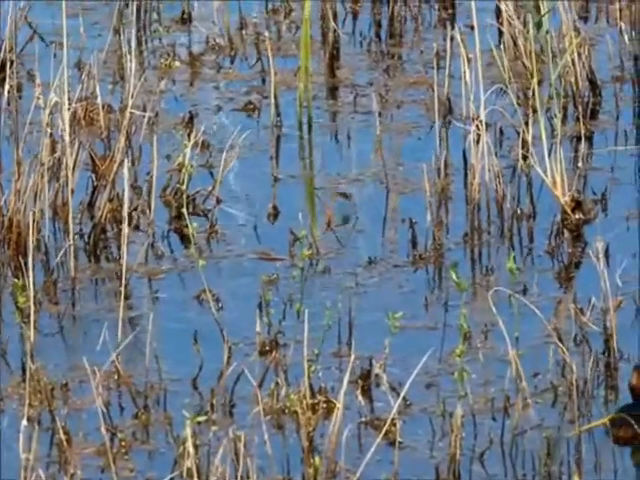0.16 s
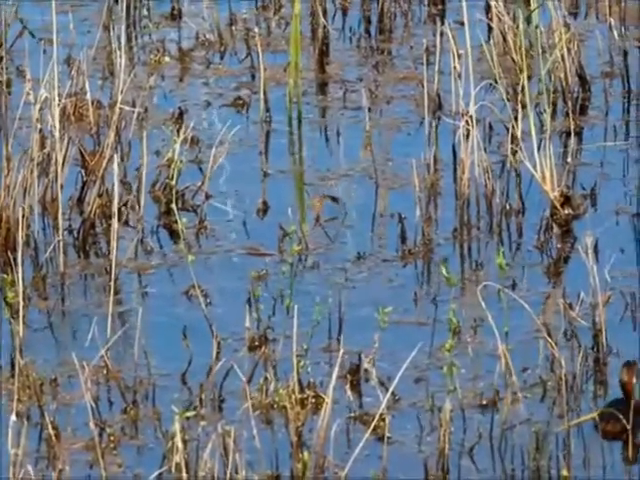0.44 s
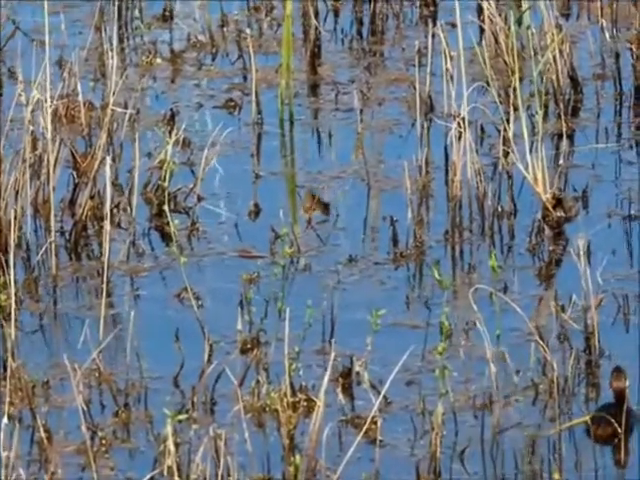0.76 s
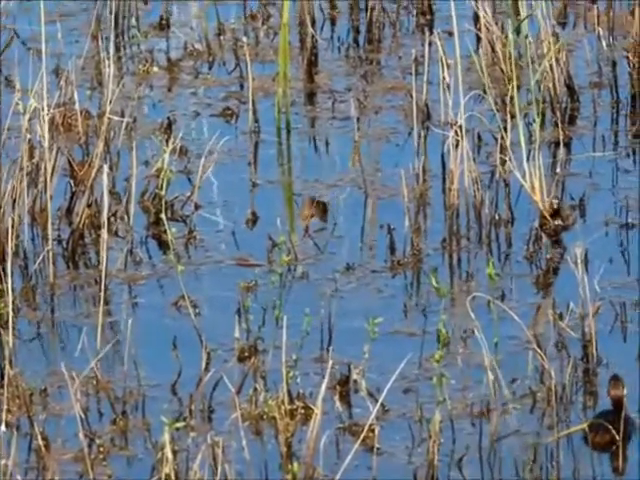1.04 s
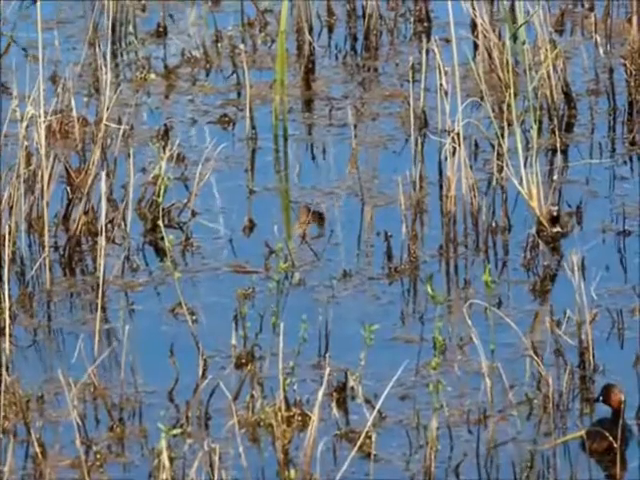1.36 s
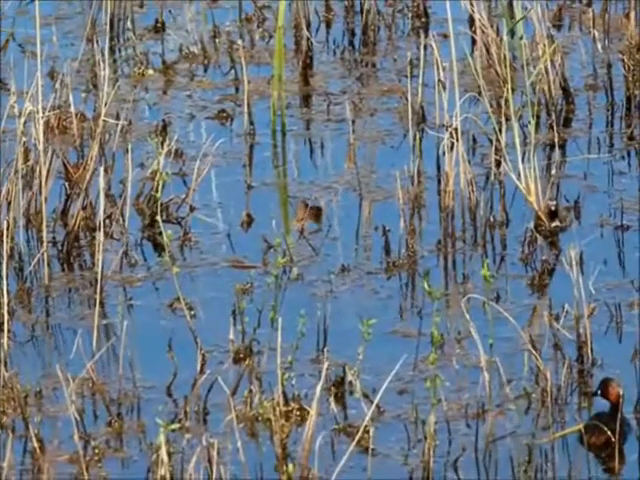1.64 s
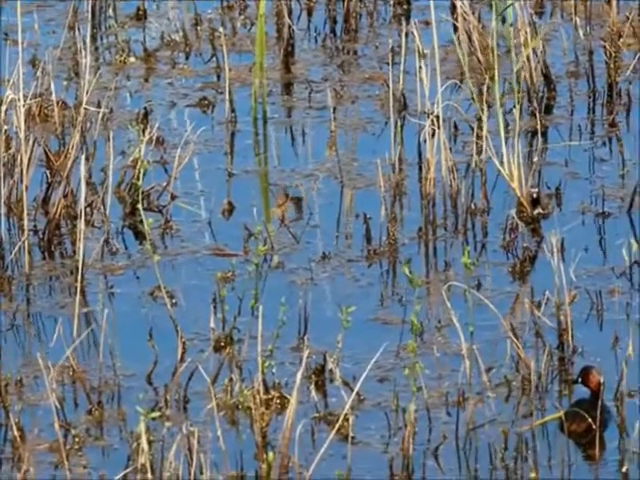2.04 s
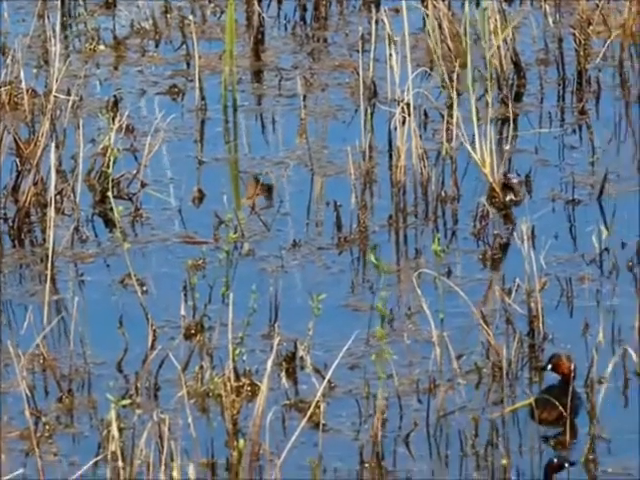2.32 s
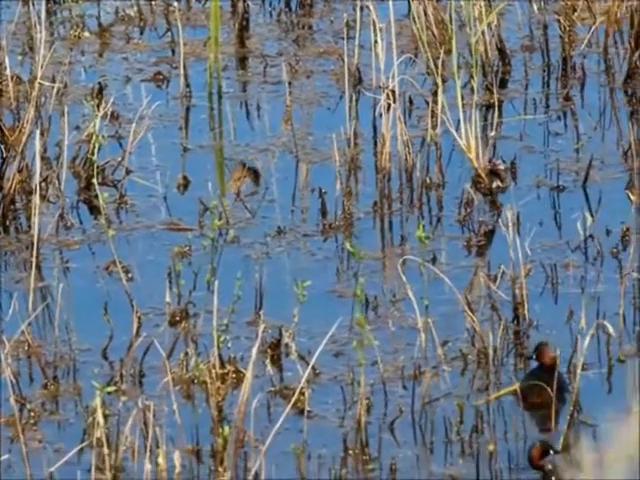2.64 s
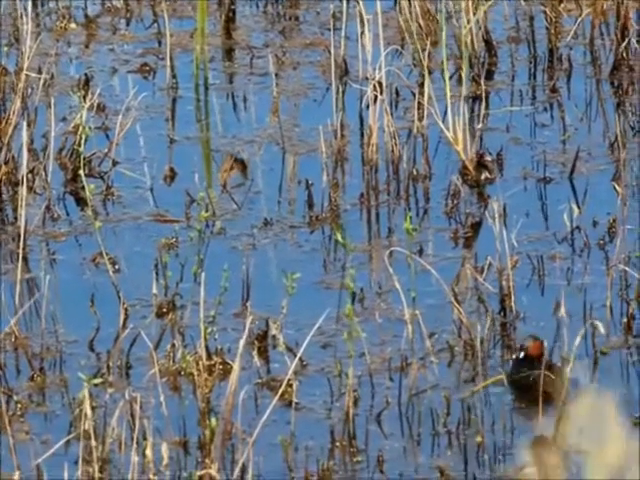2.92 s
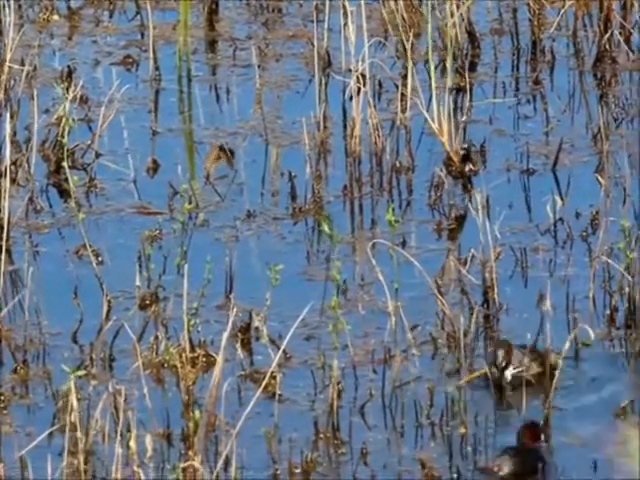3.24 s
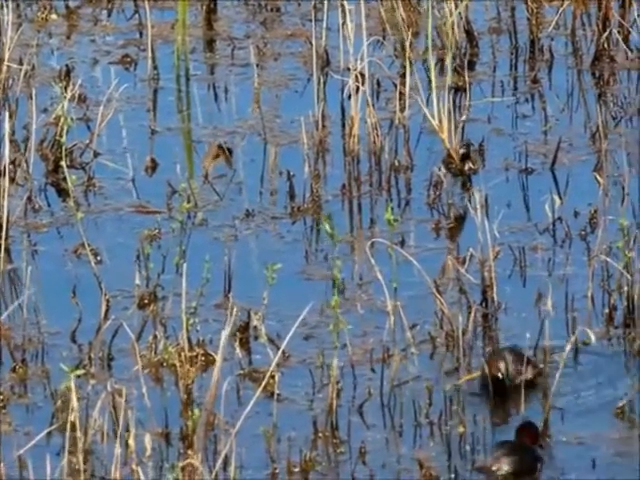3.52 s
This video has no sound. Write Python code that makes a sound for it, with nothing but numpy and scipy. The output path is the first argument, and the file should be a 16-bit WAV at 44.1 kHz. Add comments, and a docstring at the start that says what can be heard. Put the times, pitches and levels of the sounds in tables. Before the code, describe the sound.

Water birds give four brief, whistled notes late, growing louder with close echoes from bank and reeds. Before and beneath them, frogs tick, distant birds chirp, reeds hiss and light wind bumps the microphone.

```python
"""A reedy marsh: little grebes begin a quickening call, and a bank and the reeds throw each note back.
Grebes and far birds are bent sine notes with diffuse tails; rasps among the birds are bursts of band noise.
Frog clicks are decaying resonances of the vocal sac; wind puffs thump the microphone ports in opposite phase.
Shaped stereo noise makes the murmur and the hissing reeds; the camera adds two faint wavering whines."""
import sys
import numpy as np
from scipy import signal
from scipy.fft import rfft, irfft, next_fast_len
from scipy.io import wavfile
from scipy.ndimage import uniform_filter1d, map_coordinates

SR = 44100
rng = np.random.default_rng(int(sys.argv[2]) if len(sys.argv) > 2 else 0)


def transcribe(signal):
    """Save signal, clipped to [-1, 1], as a 16-bit WAV file at the path in sys.argv[1]."""
    frames = np.atleast_2d(signal).T
    limited = np.clip(frames, -1, 1)
    pcm = np.round(limited * 32767).astype(np.int16)
    wavfile.write(sys.argv[1], SR, pcm)


def natural_amplitude(level_db):
    """Convert a level in decibels to a linear amplitude factor, elementwise."""
    exponent = np.asarray(level_db, float) / 20
    return 10 ** exponent


N = 162288  # samples


def unit(x):
    """Normalisation: scales a signal to an rms of 1."""
    return x / np.sqrt(np.mean(x ** 2) + 1e-20)


def along(points, hz):
    """Interpolation of (Hz, value) points on a logarithmic frequency axis."""
    f, v = np.transpose(points)
    return np.interp(np.log(hz + 1), np.log(f + 1), v)


def curve(rows):
    """Linear interpolation of (s, value) rows to one value per sample."""
    s, v = np.transpose(rows)
    return np.interp(np.arange(N) / SR, s, v)


def wobble(rate):
    """Slow random modulation: a smooth curve through rate Gaussian knots a second."""
    return map_coordinates(rng.standard_normal(2000), [np.arange(N) * rate / SR])


def filtered(x, response):
    """Linear filtering: the spectrum of x is multiplied by a response of frequency."""
    m = next_fast_len(N + 8192)
    return irfft(rfft(x, m) * response(np.fft.rfftfreq(m, 1 / SR)), m)[..., :N]


def panned(x, pan_db):
    """Interaural level difference: left exceeds right by pan_db."""
    return x * natural_amplitude(np.array([[pan_db / 2], [-pan_db / 2]]))


def add(out, s, sound):
    """Superposition: adds a sound into out from time s in seconds."""
    i = max(round(s * SR), 0)
    out[..., i:i + sound.shape[-1]] += sound[..., :N - i]


def note(length, start_hz, middle_hz, end_hz, db, attack, release, overtones=()):
    """Frequency modulation: the pitch follows a parabola; attack and release are shares of the note."""
    u = np.arange(round(length * SR)) / (length * SR)
    hz = start_hz * (1 - u) * (1 - 2 * u) + 4 * middle_hz * u * (1 - u) + end_hz * u * (2 * u - 1)
    phase = 2 * np.pi * np.cumsum(hz) / SR
    ramp = np.clip(np.minimum(u / attack, (1 - u) / release), 0, 1)
    envelope = np.sin(np.pi / 2 * ramp)
    harmonics = np.sin(phase) + sum(natural_amplitude(d) * np.sin(k * phase) for k, d in overtones)
    return natural_amplitude(db) * np.sqrt(2) * envelope * harmonics


def scatter(x, t60):
    """Diffuse reflection by the reed bed: a decaying noise response, independent for each ear."""
    t = np.arange(SR // 4) / SR
    tail = rng.standard_normal((2, len(t))) * natural_amplitude(-60 * t / t60)
    return signal.fftconvolve(x, tail / np.linalg.norm(tail[0]), axes=1)[:, :N]


def rush(spectrum, patchy_db):
    """Partly coherent stereo noise of rms 1, its gain patchy over time and frequency."""
    # Each row: frequency in Hz, left-right correlation.
    likeness = [(60, -0.071), (130, 0.56), (290, 0.64), (640, 0.5), (1410, 0.19), (3100, 0.25),
                (6820, 0.304), (15000, 0.3)]
    # Each row: frequency in Hz, left over right in dB.
    balance = [(60, -0.5), (110, -1.5), (200, 0.5), (380, 1), (700, 1), (1290, 0.5), (2380, 1.5),
               (4400, 0.5), (8120, 0.5), (15000, 0.5)]
    z = signal.stft(rng.standard_normal((2, N)), nperseg=512)[2]
    field = uniform_filter1d(rng.standard_normal(z.shape[1:]), size=6, axis=0)
    field = uniform_filter1d(field, size=10, axis=1)
    pair = signal.istft(z * natural_amplitude(patchy_db * unit(field)), nperseg=512)[1][:, :N]

    def mid_side_response(hz):
        # The share of mid and side sets the correlation of left and right.
        angle = np.arccos(np.clip(along(likeness, hz), -1, 1)) / 2
        return natural_amplitude(along(spectrum, hz)) * [np.cos(angle), np.sin(angle)]

    def balance_response(hz):
        return natural_amplitude(np.outer([.5, -.5], along(balance, hz)))

    mid, side = filtered(pair, mid_side_response)
    return unit(filtered(np.array([mid + side, mid - side]), balance_response))


def grebes():
    """Discrete echoes: delayed copies of the bent notes beat against the direct sound."""
    # Each row: start in seconds, length in seconds, start, middle and end pitch in Hz, level in dB.
    calls = [(3.21147, .0433, 2006, 1947, 1771, -43.9), (3.34063, .0332, 2178, 2110, 1918, -34.4),
             (3.471, .0381, 2142, 2132, 1874, -34.1), (3.57398, .036, 2139, 2202, 1983, -30.6)]
    # Overtones of the call. Each row: multiple of the pitch, level in dB re the fundamental.
    overtones = [(2, -24), (3, -33)]
    # Answers of bank and reeds. Each row: delay in seconds, left and right gain in dB.
    echoes = [(.00698, -8.3, -18.2), (.01248, -8.5, -15), (.01762, -11.4, -22.7)]
    voice = np.zeros(N)
    for s, *row in calls:
        add(voice, s, note(*row, attack=.29, release=.356, overtones=overtones))
    out = panned(voice, 1.2) + natural_amplitude(-17) * scatter(voice[None], t60=.12)
    for delay, left_db, right_db in echoes:
        gains = natural_amplitude([[left_db], [right_db]])
        out += filtered(voice, lambda hz: gains * np.exp(-2j * np.pi * hz * delay))  # phase shift delays
    return out


def birds():
    """Amplitude fluctuation in the air: far whistles and fainter random chatter flutter together."""
    # Each row: start in seconds, length in seconds, start, middle and end pitch in Hz,
    # level in dB before the flutter.
    whistles = [(0.07, .015, 5630, 4900, 4500, -56), (0.199, 0.177, 5400, 5300, 5160, -67),
                (.21, 0.13, 1770, 1771, 1770, -52.5), (.35, 0.095, 1770, 1794, 1760, -53.5),
                (0.366, 0.025, 1920, 1920, 1900, -52), (0.453, 0.0098, 1950, 2020, 2050, -48),
                (.455, .016, 6050, 5600, 5200, -56), (.465, .028, 5350, 5090, 5100, -51.5),
                (.495, .012, 5000, 4800, 4600, -54), (0.537, 0.037, 3520, 3418, 3070, -51),
                (0.756, 0.058, 3534, 3510, 3120, -54), (.992, 0.058, 2790, 2690, 2474, -55),
                (0.996, 0.049, 3270, 3460, 3270, -54), (1.217, 0.028, 3180, 3204, 3180, -58.5),
                (1.625, .072, 3520, 3350, 2750, -55), (1.66, .04, 4700, 4726, 4800, -61),
                (1.734, 0.15, 3460, 3730, 4000, -54), (1.757, 0.049, 2610, 2740, 2670, -52.5),
                (1.771, 0.024, 3210, 3280, 3210, -52.5), (1.834, 0.048, 3490, 3720, 3120, -51.5),
                (1.904, 0.068, 1990, 2100, 2130, -56), (1.969, 0.063, 2756, 2775, 2740, -47.5),
                (1.99, 0.036, 2250, 2270, 2260, -55), (2.037, 0.0341, 2136, 2043, 1820, -56),
                (2.072, .064, 3330, 3570, 2970, -54), (2.089, .13, 2694, 2665, 2640, -59.5),
                (2.13, 0.036, 1920, 2000, 2000, -54.5), (2.31, .04, 2424, 2550, 2540, -54),
                (2.476, .015, 5330, 5200, 5050, -58), (2.558, 0.048, 3230, 3250, 3240, -56),
                (.1, 0.21, 4550, 4500, 4430, -67), (2.708, 0.015, 2770, 2737, 2750, -51),
                (2.802, .02, 5240, 5200, 5050, -55.5), (2.923, 0.0343, 2897, 2857, 2745, -74),
                (3.382, .025, 2576, 2547, 2670, -48), (3.57, 0.0142, 2980, 3160, 3350, -48)]
    edge = 0.094  # attack and release as shares of a note
    out = np.zeros((2, N))
    for (s, *row), pan in zip(whistles, rng.normal(0, 1, len(whistles))):
        add(out, s, panned(note(*row, edge, edge), 1 + 1.8 * pan))

    chatter_per_s, low_hz, high_hz = 30, 1600, 5500
    for s, a, b, c, d in rng.random((round(chatter_per_s * N / SR), 5)):
        hz = low_hz * (high_hz / low_hz) ** a
        length = 0.0193 + 0.084 * b
        song = note(length, hz, hz, hz * (1 - 0.056 * c), -70 + 4 * c, edge, edge)
        add(out, s * N / SR, panned(song, 8 * (d - .5)))
    out *= natural_amplitude(2 * wobble(90))
    return out + natural_amplitude(-8.5) * scatter(out, t60=0.16)


def rasps():
    """Band-limited noise: short harsh bursts under a soft swell."""
    # Each row: start in seconds, length in seconds, low and high band edge in Hz,
    # rms level over the burst in dB.
    bursts = [(1.271, 0.045, 1482, 3410, -50), (2.889, 0.0965, 2070, 3016, -50)]
    out = np.zeros((2, N))
    for s, length, low_hz, high_hz, db in bursts:
        burst = np.zeros((2, N))
        count = round(length * SR)
        add(burst, s, rng.standard_normal((2, count)) * np.hanning(count))
        common = burst.sum(0)  # makes the two channels partly alike
        band = filtered(burst + common, lambda hz: (hz > low_hz) & (hz < high_hz))
        out += natural_amplitude(db) * unit(band) * np.sqrt(length * SR / N)
    return out


def frogs():
    """Damped resonance: each click rings the vocal sac briefly, near frogs over a farther chorus."""
    # Nearer clicks. Each row: start in seconds, nominal peak level in dB.
    near = [(0.053, -48), (0.087, -54.5), (0.107, -44), (0.156, -56), (0.173, -40), (0.327, -52.5),
            (0.387, -52), (0.406, -48), (0.508, -42), (0.62, -46), (0.637, -37), (0.667, -40.5),
            (0.722, -43), (0.747, -53), (0.767, -55), (0.827, -50), (0.884, -48), (0.941, -43),
            (0.963, -45), (0.979, -41.5), (1.011, -49), (1.078, -43.5), (1.152, -43.5), (1.231, -47),
            (1.282, -40), (1.353, -41.5), (1.388, -48.5), (1.55, -45), (1.59, -45), (1.627, -43),
            (1.695, -47), (1.76, -45.5), (1.821, -39.5), (1.894, -43), (1.931, -45), (2.012, -53.5),
            (2.068, -43), (2.104, -50), (2.136, -43.5), (2.25, -44), (2.27, -47.5), (2.331, -41),
            (2.475, -41.5), (2.513, -46), (2.66, -38), (2.773, -55), (2.794, -41.5), (2.828, -49),
            (2.909, -52), (2.965, -44.5), (2.998, -41.5), (3.181, -41.5), (3.235, -48), (3.25, -46),
            (3.308, -45), (3.389, -44), (3.446, -54), (3.513, -42), (3.589, -42.5), (3.621, -44.5)]
    # Modes of the sac. Each row: multiple of the pitch, level in dB, decay time t60 in seconds.
    modes = [(1, 3, 0.027), (1.8, -3.5, 0.023)]
    pitch_hz, attack_s, chorus_per_s = 951, 0.0012, 60
    out, t = np.zeros((2, N)), np.arange(SR // 20) / SR
    clicks = []  # start in seconds, level in dB, pitch in Hz, pan in dB
    for (s, db), (a, b) in zip(near, rng.normal(0, 1, (len(near), 2))):
        clicks.append((s, db, pitch_hz * (1 + 0.041 * a), 2.5 + b))
    for s, a, b, c in rng.random((round(chorus_per_s * N / SR), 4)):
        clicks.append((s * N / SR, -58 + 8 * a, pitch_hz * (1 + .16 * (b - .5)), 12 * (c - .5)))

    for (s, db, hz, pan_db), turns in zip(clicks, rng.random((len(clicks), 2))):
        ring = sum(natural_amplitude(d - 60 * t / t60) * np.sin(2 * np.pi * (k * hz * t + turn))
                   for (k, d, t60), turn in zip(modes, turns))
        onset = 1 - np.exp(-t / attack_s)
        add(out, s, panned(natural_amplitude(db) * 1.56 * ring * onset, pan_db))
    return out


def wind():
    """Pressure puffs: they push the two ports in opposite phase, over a lumpy uncorrelated rumble."""
    # Rumble spectrum. Each row: frequency in Hz, relative density in dB per Hz.
    buffet = [(15, -19), (40, -1), (90, -5.5), (160, -29), (260, -69)]
    # Each row: centre in seconds, envelope peak in dB before the port difference, pitch in Hz.
    thumps = [(.6, -52, 45), (.78, -52, 55), (.95, -45, 85), (1.125, -46, 65), (1.225, -46, 80),
              (1.389, -46, 80), (1.53, -45, 55), (1.62, -42, 45), (1.691, -45, 75), (1.77, -43, 90),
              (1.9, -50, 65), (2.145, -38.5, 80), (2.24, -48, 45), (2.409, -41.5, 65), (2.6, -37, 65),
              (2.69, -46, 50), (2.925, -36, 75), (3.04, -42.5, 50), (3.274, -41, 85), (3.59, -49, 55)]
    noise = unit(filtered(rng.standard_normal((2, N)), lambda hz: natural_amplitude(along(buffet, hz))))
    out = natural_amplitude(-66 + 3.6 * wobble(8.2)) * noise
    half_width_cycles, uneven_db = .55, 7  # one port, chosen at random, is hit harder
    t = np.arange(-SR // 20, SR // 20) / SR
    for (s, db, hz), (a, b) in zip(thumps, rng.random((len(thumps), 2))):
        envelope = np.exp(-(t * hz / half_width_cycles) ** 2)
        puff = natural_amplitude(db) * envelope * np.cos(2 * np.pi * (hz * t + a))
        add(out, s - 1 / 20, panned(puff, uneven_db * np.sign(b - .5)) * [[1], [-1]])
    return out


def murmur():
    """Broadband noise: the far hum and murmur of the marsh, nearly steady."""
    # Each row: frequency in Hz, relative density in dB per Hz.
    spectrum = [(15, -36), (30, -10), (100, -7), (170, -2), (237, -1), (532, -4.5), (686, -7.5),
                (964, -5.5), (1240, -9), (1670, -5.5), (1980, -8.5), (2560, -8.5), (3600, -11),
                (5000, -16.5), (7000, -30.5), (11000, -31)]
    # Each row: time in seconds, level in dB.
    level = [(0, -48), (.5, -47), (1, -47), (1.45, -47), (1.85, -44.5), (2.4, -47), (2.93, -46), (3.2, -46),
             (3.68, -44.5)]
    return natural_amplitude(curve(level) + 0.29 * wobble(3.96)) * rush(spectrum, patchy_db=0.87)


def reeds():
    """Modulated noise: the hiss of the reeds swells with the breeze."""
    # Each row: frequency in Hz, relative density in dB per Hz.
    spectrum = [(1200, -30), (2200, -2), (3300, -3), (4700, -4.5), (6300, -6), (7800, -10), (11000, -14.5),
                (14900, -20.5), (15700, -30.5)]
    # Each row: time in seconds, level of the top band of the hiss in dB.
    breeze = [(0, -63.5), (.3, -63), (.45, -61.5), (.6, -63.5), (1, -63.5), (1.2, -59), (1.45, -61.5),
              (1.75, -61), (1.85, -58.5), (2.15, -59.5), (2.3, -60), (2.5, -56), (2.68, -62), (2.85, -55.5),
              (3.1, -58.5), (3.35, -56), (3.68, -55.5)]
    whole_over_top_db = 6.5
    level_db = curve(breeze) + whole_over_top_db + 0.98 * wobble(6.85) + wobble(13)
    return natural_amplitude(level_db) * rush(spectrum, patchy_db=1.45)


def scene():
    """Superposition of all the sources on the marsh."""
    return grebes() + birds() + rasps() + frogs() + wind() + murmur() + reeds()


def camera_whine():
    """Narrow-band tones: two sines waver in level and phase."""
    # Each row: frequency in Hz, level in dB before the wavering.
    tones = [(11676, -82), (15579, -77.5)]
    t = np.arange(N) / SR
    return sum(np.sqrt(2) * natural_amplitude(db + 3.3 * wobble(6)) * np.sin(2 * np.pi * hz * t + 1.5 * wobble(12))
               for hz, db in tones)


def mirrored(x):
    """Amplitude modulation: each carrier adds sidebands, copies of the sound shifted in frequency."""
    # Each row: carrier in Hz, level of each shifted copy in dB.
    mirrors = [(7790, -28.5), (15579, -35)]
    t = np.arange(N) / SR
    carriers = sum(2 * natural_amplitude(db) * np.cos(2 * np.pi * hz * t) for hz, db in mirrors)
    return x * (1 + carriers)


def low_pass(x):
    """Removes everything above the highest recorded frequency."""
    return signal.sosfilt(signal.butter(12, 15760, fs=SR, output="sos"), x)


def record(dry):
    """Band limitation: the mirrored sound and the camera's whine keep nothing above 15750 Hz."""
    mix = filtered(mirrored(dry) + camera_whine(), lambda hz: hz < 15750)
    return low_pass(mix)


dry = scene()
out = record(dry)
transcribe(out)
```